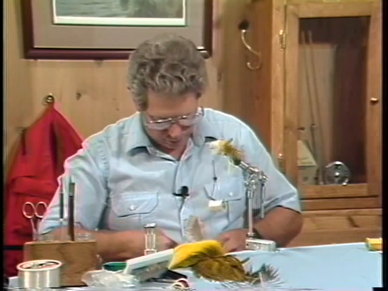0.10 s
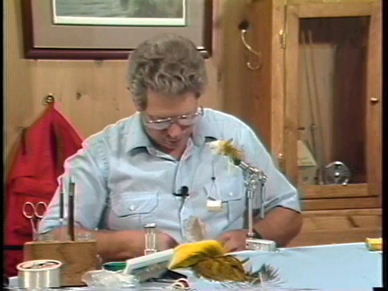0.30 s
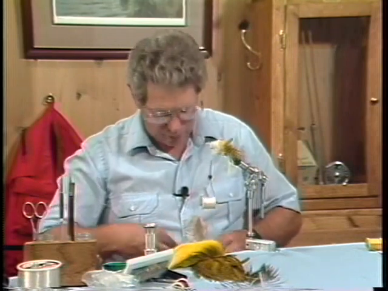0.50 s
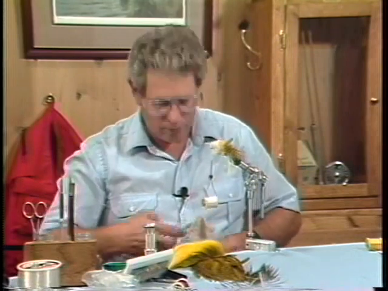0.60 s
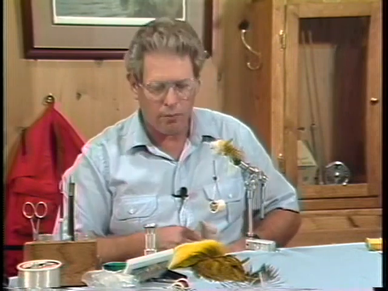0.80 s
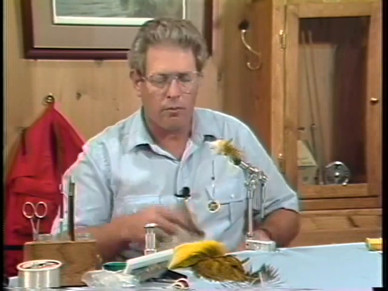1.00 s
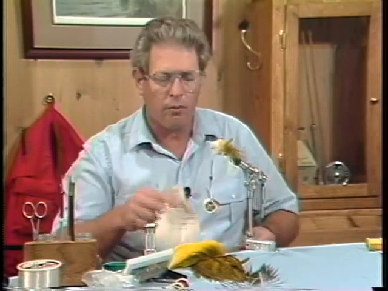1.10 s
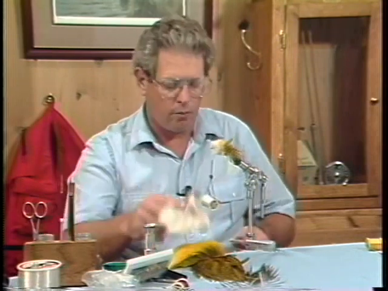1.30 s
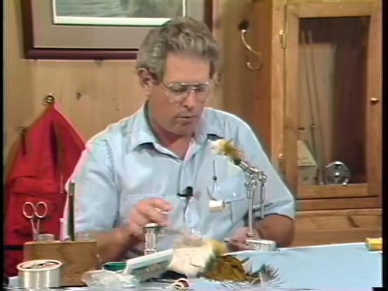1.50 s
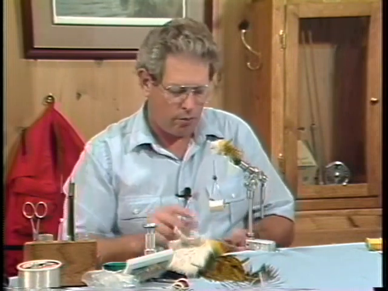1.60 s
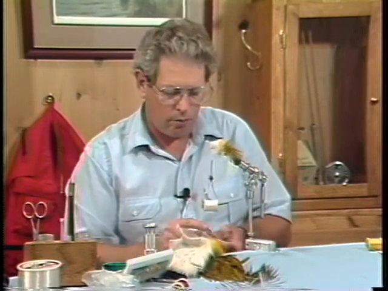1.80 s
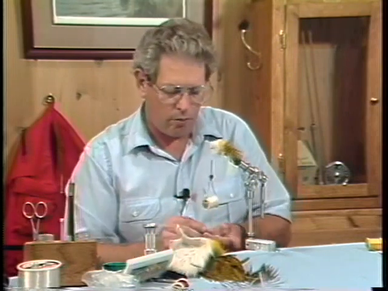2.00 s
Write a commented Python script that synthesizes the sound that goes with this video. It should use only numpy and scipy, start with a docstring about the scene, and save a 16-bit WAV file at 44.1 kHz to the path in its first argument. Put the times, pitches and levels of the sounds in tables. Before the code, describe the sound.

Light bright ticks and sleeve rustle lead to a single crisp metallic snip through dry hair, followed by a brief brushing swish and small soft bumps, heard close on a clothing microphone in a small, quiet room.

```python
"""A quiet room, a tying desk: small scissors cut a clump of deer hair close to a clip-on microphone.
Hairs snap and the blades tick once, as bright noise ticks; the clump crunches as dense clicks, and the
blades clack and ring shut. Hair, sleeve and hide rustle as grains under swelling strokes while the hide
is lifted away. Hands and body make soft low sine bumps and noise rumble, over steady hiss and mains hum."""
import sys
import numpy as np
from scipy import signal
from scipy.fft import rfft, irfft
from scipy.io import wavfile

SR = 44100
rng = np.random.default_rng(int(sys.argv[2]) if len(sys.argv) > 2 else 0)


def waveform_to_disk(signal):
    """Save audio, clipped to [-1, 1], as 16-bit WAV at the path in sys.argv[1]."""
    frames = np.transpose(np.atleast_2d(signal))
    scaled = np.clip(frames, -1, 1) * 32767
    samples = np.round(scaled).astype(np.int16)
    wavfile.write(sys.argv[1], SR, samples)


N = 88200  # samples: 2 s


def amp(db):
    """Decibels to amplitude gain."""
    return 10 ** (np.asarray(db) / 20)


def unit(x):
    """Scales to rms 1."""
    return x / np.sqrt(np.mean(x ** 2) + 1e-20)


def seconds(size):
    """Time axis in seconds."""
    return np.arange(size) / SR


def add(mix, start, sound):
    """Mixes a sound in at a start time in seconds, cutting it at the end of the mix."""
    part = mix[max(round(start * SR), 0):][:len(sound)]
    part += sound[:len(part)]


def read(points, hz):
    """Interpolates a frequency table on a log-frequency axis."""
    f, value = np.transpose(points)
    return np.interp(np.log(hz + 1), np.log(f + 1), value)


def colour(x, points):
    """Gives x a spectrum by a minimum-phase filter, so attacks do not smear backwards; rms 1."""
    log_gain = np.log(amp(read(points, abs(np.fft.fftfreq(4096, 1 / SR)))))
    minimum_phase = np.exp(np.conj(signal.hilbert(log_gain)))
    taps = np.fft.ifft(minimum_phase).real
    return unit(signal.fftconvolve(x, taps)[:len(x)])


def grains(per_s, spread_db, size):
    """Random one-sample clicks of uneven height and either sign."""
    height = amp(spread_db * np.minimum(rng.exponential(1, size), 3))
    sign = rng.choice([-1., 1.], size)
    present = rng.random(size) < per_s / SR
    return height * sign * present


def burst(decay_s, points):
    """A brief coloured noise crack, scaled as an exponential decay that starts at 1."""
    t = seconds(2048)
    noise = rng.choice([-1., 1.], len(t))
    crack = colour(noise * np.exp(-t / decay_s), points)
    return crack * np.sqrt(decay_s * SR / 2 / len(t))  # rms of the decay over the burst


def rustle(strokes, points, grain_db):
    """Dense fibre slips, as coloured grains, under strokes that swell, hold and die away."""
    grains_per_s = 3800
    t, level = seconds(SR // 2), np.zeros(N)
    for start, db, attack, hold, decay in strokes:
        swell = np.minimum(t / attack, 1)
        fade = np.exp(-np.maximum(t - attack - hold, 0) / decay)
        add(level, start, amp(db) * swell * fade)
    return level * colour(grains(grains_per_s, grain_db, N), points)


def hair_rustle():
    """Hair brushes on hair: bright rustle of uneven fibre slips."""
    # Each row: start in seconds, level in dB, attack, hold and decay in seconds.
    hair_strokes = [(.0, -58, 0.037, 0.022, 0.029), (.14, -59.5, 0.018, 0.037, .02),
                    (.196, -56, 0.0093, 0.042, 0.013), (.29, -59.5, .02, 0.022, .01),
                    (.36, -60, 0.011, 0.024, 0.042), (.425, -53.5, 0.029, 0.033, 0.017),
                    (.52, -64.5, 0.046, 0.066, .06), (.79, -44.5, .015, 0.018, .014),
                    (.84, -54.5, .01, 0.046, 0.023), (.92, -64.5, 0.018, 0.067, 0.13),
                    (1.25, -62, 0.047, .03, .04)]
    # Spectrum of brushed hair. Each row: frequency in Hz, relative level in dB per Hz.
    hair_colour = [(300, -32), (1500, -23), (3700, -17), (5500, -9.5), (7500, -0.5), (9300, 0),
                   (11500, -6.5), (13500, -14.5)]
    return rustle(hair_strokes, hair_colour, grain_db=4.5)


def cloth_rustle():
    """Sleeve and hide slide: the same fibre slips with a darker spectrum."""
    # Each row: start in seconds, level in dB, attack, hold and decay in seconds.
    cloth_strokes = [(0, -59.5, 0.0042, .04, 0.091), (.185, -51.5, 0.027, 0.034, .015),
                     (.28, -55.5, .02, 0.042, 0.0081), (.37, -60.5, 0.012, 0.11, 0.074),
                     (.6, -60.5, 0.018, .04, 0.043), (.8, -57.5, 0.013, 0.023, .02),
                     (.841, -51, .002, .004, 0.0068), (.89, -59, 0.03, .09, 0.11),
                     (1.245, -59.5, 0.0091, 0.11, 0.07)]
    # Spectrum of the sliding cloth. Each row: frequency in Hz, relative level in dB per Hz.
    cloth_colour = [(40, -6), (120, 2), (300, 1.5), (600, -8), (1200, -15), (2500, -16.5), (5000, -20.5),
                    (13000, -35)]
    return rustle(cloth_strokes, cloth_colour, grain_db=3.3)


def rumble():
    """The shifting body gives low noise whose level wanders."""
    # Each row: time in seconds, level in dB.
    rumble_level = [(0, -51), (.15, -54.5), (.45, -53.5), (.7, -56.5), (.92, -56), (1.1, -64.5),
                    (1.4, -57.5), (1.6, -67), (2, -71)]
    # Spectrum of the rumble. Each row: frequency in Hz, relative level in dB per Hz.
    rumble_colour = [(15, -19), (30, -8.5), (50, 0.5), (90, -9), (170, -9.5), (300, -22), (800, -44.5)]
    level = amp(np.interp(seconds(N), *np.transpose(rumble_level)))
    return level * colour(rng.standard_normal(N), rumble_colour)


def background():
    """Steady hiss of coloured noise and mains hum of steady sines."""
    hiss_db = -58.5
    # Tones of the hum. Each row: frequency in Hz, rms level in dB.
    hum_tones = [(59.5, -67), (119, -74), (178.5, -72), (240.5, -67), (420, -81), (540, -81)]
    # Spectrum of the hiss. Each row: frequency in Hz, relative level in dB per Hz.
    hiss_colour = [(20, -12.5), (60, -1), (180, -5), (300, -8), (500, -12.5), (900, -14.5), (2500, -17),
                   (6000, -15.5), (10000, -16), (13500, -17.5)]
    t = seconds(N)
    hum = np.zeros(N)
    for hz, db in hum_tones:
        hum += amp(db) * np.sqrt(2) * np.sin(2 * np.pi * (hz * t + rng.random()))
    return hum + amp(hiss_db) * colour(rng.standard_normal(N), hiss_colour)


def hair_and_blade_ticks():
    """Stiff hairs snap or flick, and the blades tick once at 0.4006 s: each gives one bright noise tick."""
    decay_s = 0.00073
    # Each row: start in seconds, level in dB, centre in Hz, width in octaves,
    # broad body in dB relative to the bright peak.
    tick_rows = [(.1575, -46, 9500, .6, -15), (0.2001, -38, 8500, 0.77, -10), (.2066, -40, 9000, .6, -17),
                 (0.209, -36.5, 9500, .7, -11), (.2239, -31.5, 9500, 0.37, -22),
                 (.2343, -40, 9050, 0.49, -13), (0.238, -38.5, 7000, 0.47, -11),
                 (.2449, -43, 9000, .5, -15), (0.2511, -31.5, 8400, 0.43, -17),
                 (0.29, -42, 8500, 0.43, -15), (.2969, -29.5, 7840, 0.51, -8), (0.3373, -29, 6900, .55, -5),
                 (0.3434, -36, 9000, 0.63, -14), (0.4006, -30, 6350, 0.2, -21),
                 (0.4548, -44, 8500, .3, -20), (.497, -45, 9500, 0.33, -20), (0.593, -47, 8000, .5, -18),
                 (.8005, -34, 9000, 0.18, -32), (.8033, -31.5, 9200, 0.2, -32),
                 (0.8055, -36, 9000, .23, -32), (.891, -41, 8500, .45, -15), (.963, -49, 6500, .7, -12),
                 (1.147, -48, 9000, .5, -20)]
    hz, out = np.geomspace(100, 16000, 60), np.zeros(N)
    for start, db, centre_hz, width, body_db in tick_rows:
        peak = np.exp(-.5 * (np.log2(hz / centre_hz) / width) ** 2)
        body = amp(body_db) / (1 + (hz / 7000) ** 2)
        tick_colour = np.c_[hz, 20 * np.log10(peak + body)]
        add(out, start, amp(db) * burst(decay_s, tick_colour))
    return out


def bumps():
    """Hands, arms and hide knock softly: swelling sines of sagging pitch, carried through the body."""
    shape, sag = 2.08, 0.027  # exponent of the swell; pitch fall per swell time
    # Each row: start in seconds, peak level in dB, pitch at the peak in Hz, swell time in seconds.
    bump_rows = [(0.195, -43.5, 306, 0.0087), (.218, -37, 300, 0.0042), (0.219, -41, 152.6, .012),
                 (.2195, -45, 600, .002), (.234, -46, 300, .003), (.225, -31, 60, 0.022),
                 (.3455, -34.5, 468, .003), (0.354, -26, 151.4, 0.0078), (.372, -25.5, 54.6, 0.019),
                 (.54, -40, 56.2, 0.023), (.8415, -45, 1130, 0.0022), (.842, -34, 155, .0105),
                 (.84, -36, 70, .023), (1.245, -47.5, 267, .004), (1.246, -42.5, 139, .008),
                 (1.249, -39, 72, .013)]
    out = np.zeros(N)
    for start, db, hz, swell in bump_rows:
        u = seconds(8192) / swell
        turns = np.cumsum(hz * np.exp(-sag * np.minimum(u - 1, 5))) / SR
        envelope = (u * np.exp(1 - u)) ** shape
        add(out, start, amp(db) * envelope * np.sin(2 * np.pi * turns))
    return out


def hide_drag():
    """Hide drags over fingers and desk: fibre slips strongest in the middle of the spectrum."""
    # Each row: start in seconds, level in dB, attack, hold and decay in seconds.
    hide_strokes = [(.205, -60, .01, .03, .008), (.362, -54, .004, 0.013, .06),
                    (.797, -58.5, 0.0089, 0.075, 0.021), (.905, -59, 0.016, .1, 0.074),
                    (1.248, -66, .015, .07, .03)]
    # Spectrum of the dragging hide. Each row: frequency in Hz, relative level in dB per Hz.
    hide_colour = [(150, -9), (500, 0.5), (1200, -0.5), (2200, -3.5), (3700, -3.5), (7000, -5.5),
                   (13000, -11)]
    return rustle(hide_strokes, hide_colour, grain_db=3.3)


def cut():
    """Many hollow hairs break in a rush as the blades bite, then the blades clack and ring briefly."""
    bite_s, shut_s = .3456, .3569
    crunch_db, crunch_fade_s, hairs_per_s, hair_spread_db = -31.5, 0.0017, 6000, 2
    squeeze_db, squeeze_s = 9.5, 0.0018  # extra force around the moment the blades meet
    clack_db, clack_decay_s = -22, .0007
    # Spectrum of the breaking hairs. Each row: frequency in Hz, relative level in dB per Hz.
    crunch_colour = [(150, -16), (400, -4), (750, -12.5), (1200, -10.5), (1700, -6), (2300, -14),
                     (3000, -7), (3700, -13.5), (5200, -1), (6000, -10.5), (7500, -2), (9000, -6),
                     (10600, 1), (14000, -19.5)]
    # Spectrum of the blades' clack. Each row: frequency in Hz, relative level in dB per Hz.
    clack_colour = [(200, -18), (800, -14), (1800, 2), (3000, -5.5), (6000, 4), (11000, -4), (14000, -9)]
    # Ring of the blades as they meet. Each row: frequency in Hz, level in dB, time to fall 60 dB in seconds.
    blade_modes = [(1720, -25.5, 0.01), (4280, -30.5, 0.022), (5660, -22, 0.0099), (6570, -18, 0.011),
                   (7600, -31, .012), (8150, -25, .012), (9260, -29, .01), (10330, -28, .011),
                   (10800, -22, 0.01)]
    t, out = seconds(4096), np.zeros(N)

    from_shut = t + bite_s - shut_s
    squeeze = amp(squeeze_db * np.exp(-(from_shut / squeeze_s) ** 2))
    force = squeeze * np.exp(-np.maximum(from_shut, 0) / crunch_fade_s)
    breaks = grains(hairs_per_s, hair_spread_db, len(t)) * force
    crunch = colour(breaks, crunch_colour) * np.sqrt(np.mean(force ** 2))
    add(out, bite_s, amp(crunch_db) * crunch)

    add(out, shut_s, amp(clack_db) * burst(clack_decay_s, clack_colour))
    for hz, db, t60 in blade_modes:
        ring = np.sin(2 * np.pi * (hz * t + rng.random()))
        add(out, shut_s, amp(db - 60 * t / t60) * ring)
    return out


def room(x):
    """Quick reflections from desk and chest and a faint short tail, as decaying noise echoes after 4 ms."""
    tail_db, desk_db, desk_decay_s = -20.5, -21, 0.011
    # Decay of the tail. Each row: frequency in Hz, time to fall 60 dB in seconds.
    room_decay = [(200, 0.22), (1500, 0.3), (4500, 0.31), (8000, 0.15), (13000, 0.12)]
    t = np.maximum(seconds(SR // 3) - .004, 0)
    early, late = rng.standard_normal((2, len(t))) * (t > 0)
    early = early * np.exp(-t / desk_decay_s)
    # The tail fades at its own rate in each frequency band.
    hz, age, bands = signal.stft(late, SR, nperseg=256)
    fade = amp(-60 * age / read(room_decay, hz)[:, None])
    late = signal.istft(bands * fade, SR, nperseg=256)[1][:len(t)]
    desk_echo = amp(desk_db) * early / np.linalg.norm(early)
    tail = amp(tail_db) * late / np.linalg.norm(late)
    return x + signal.fftconvolve(x, desk_echo + tail)[:N]


def scene():
    """One microphone feeds both channels, the right lagging by a small part of a sample."""
    lag_samples = 0.073
    handling = hair_rustle() + cloth_rustle() + hide_drag()
    through_air = room(handling + hair_and_blade_ticks() + cut())
    mic = through_air + rumble() + bumps() + background()
    lag = np.exp(-2j * np.pi * np.fft.rfftfreq(N) * lag_samples)
    return np.array([mic, irfft(rfft(mic) * lag, N)])


def record(dry):
    """The recorder's band limit: a steep low-pass filter without delay."""
    edge_hz = 13700
    taps = signal.firwin(401, edge_hz, window=("kaiser", 9), fs=SR)
    return signal.oaconvolve(dry, taps[None], "same")


dry = scene()
out = record(dry)
waveform_to_disk(out)
```